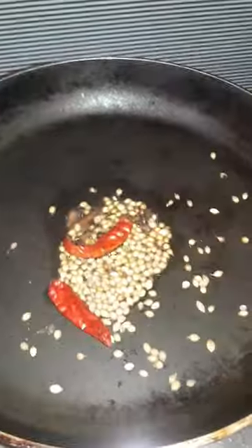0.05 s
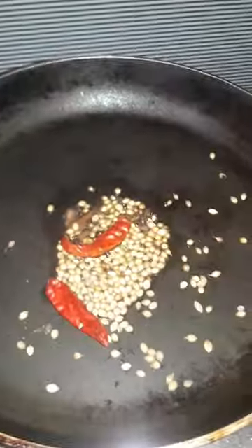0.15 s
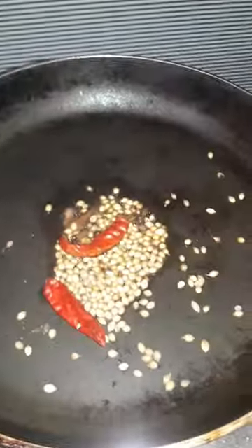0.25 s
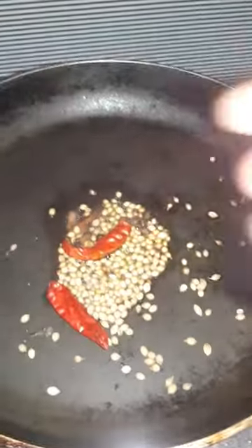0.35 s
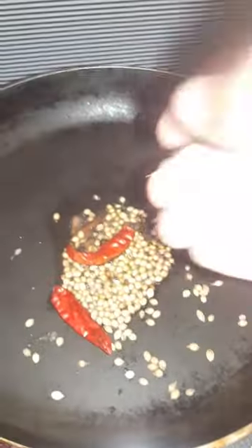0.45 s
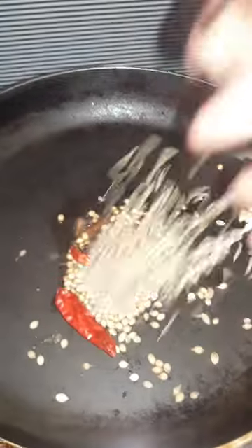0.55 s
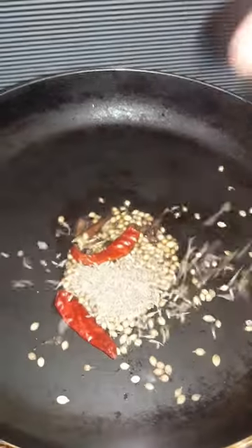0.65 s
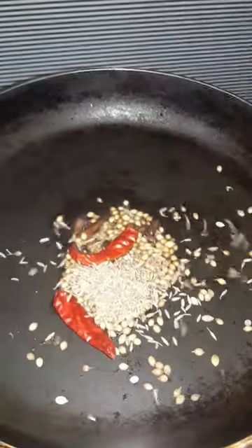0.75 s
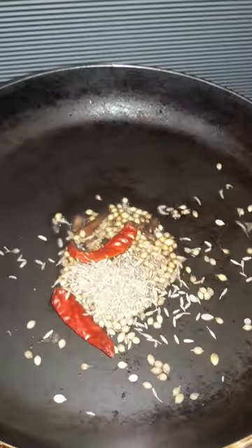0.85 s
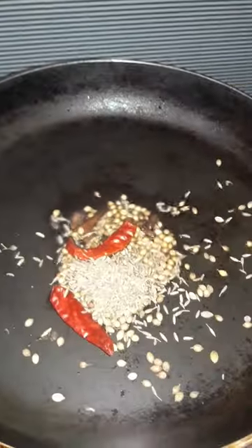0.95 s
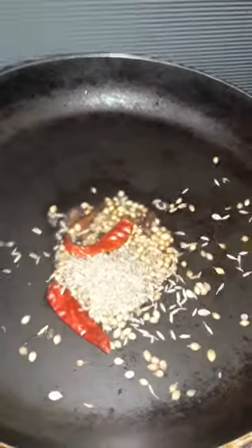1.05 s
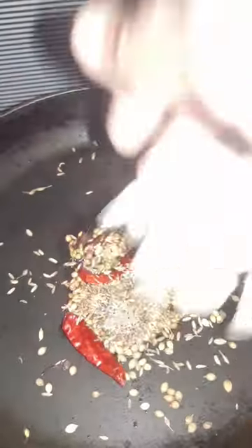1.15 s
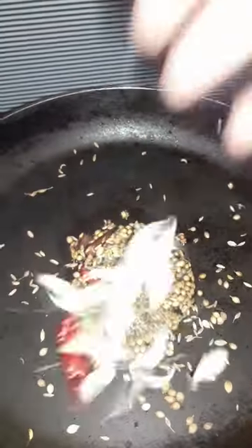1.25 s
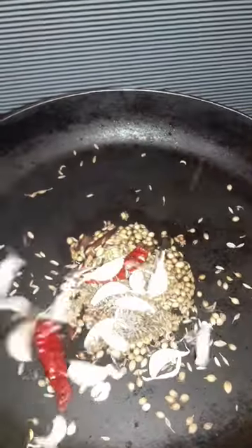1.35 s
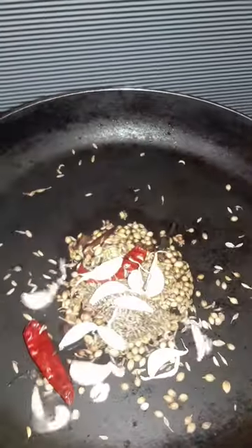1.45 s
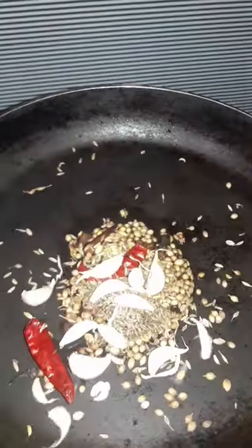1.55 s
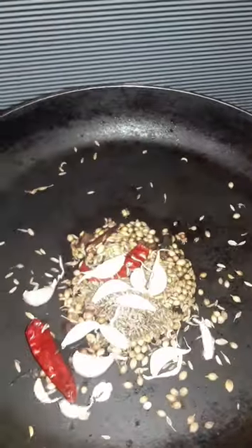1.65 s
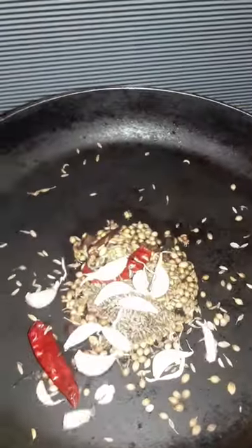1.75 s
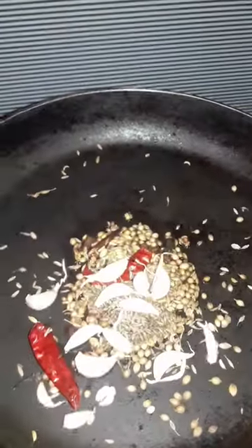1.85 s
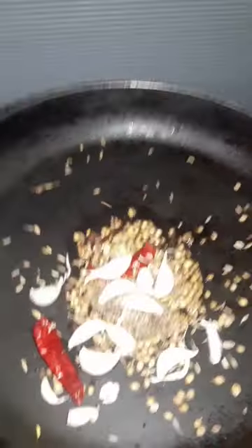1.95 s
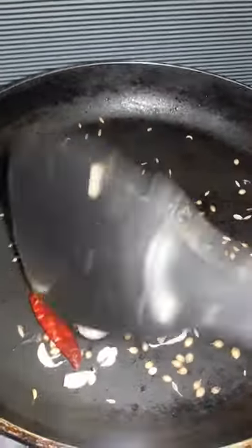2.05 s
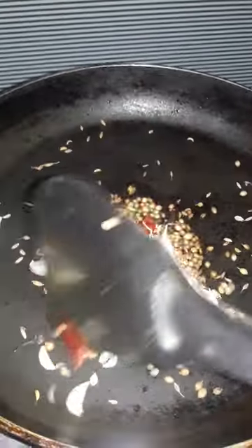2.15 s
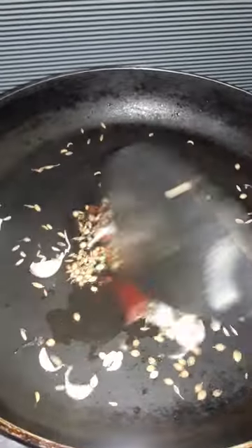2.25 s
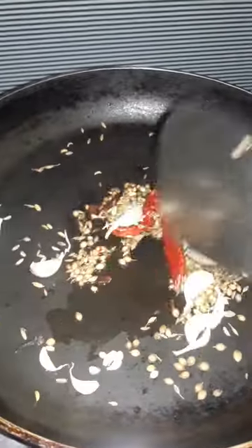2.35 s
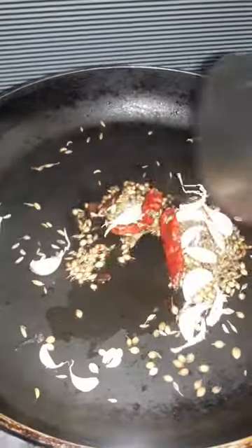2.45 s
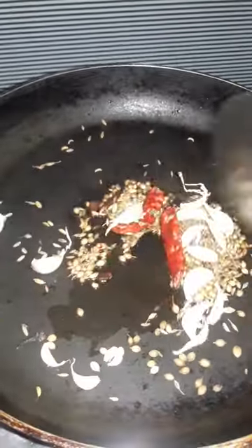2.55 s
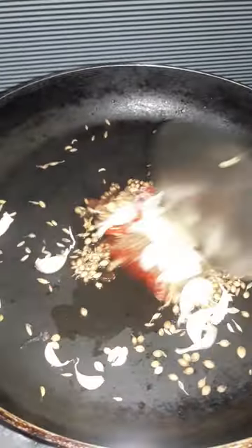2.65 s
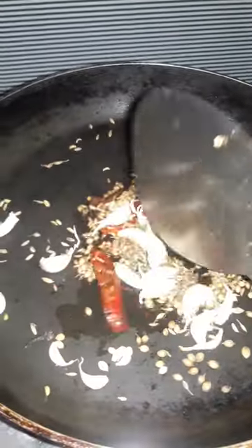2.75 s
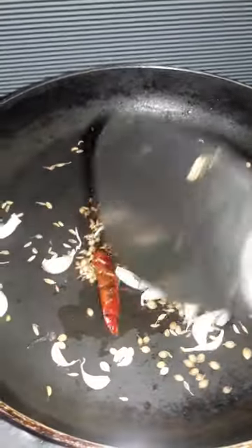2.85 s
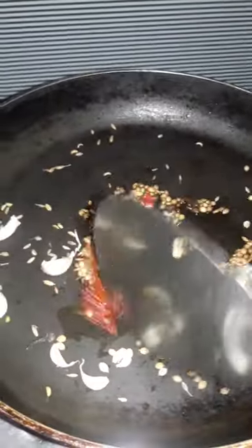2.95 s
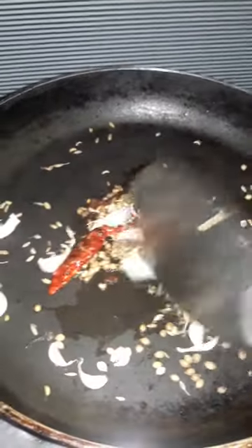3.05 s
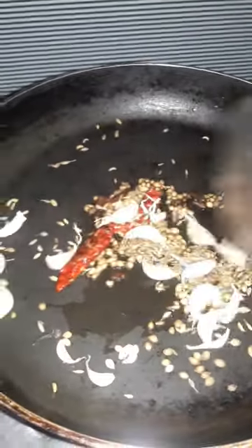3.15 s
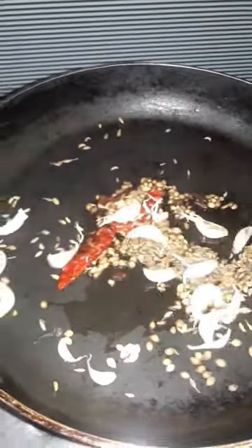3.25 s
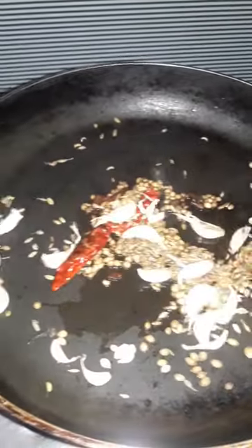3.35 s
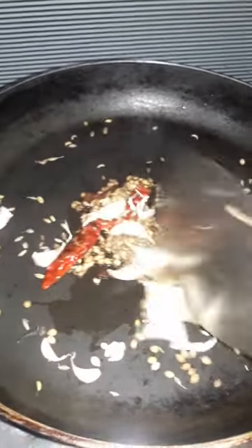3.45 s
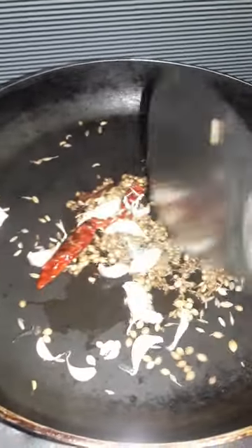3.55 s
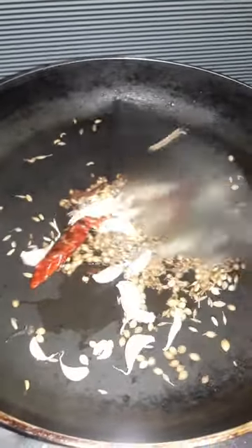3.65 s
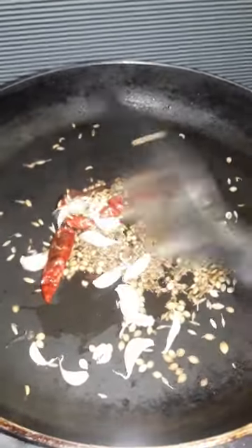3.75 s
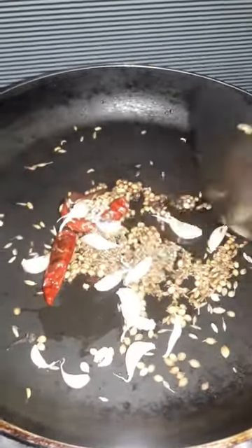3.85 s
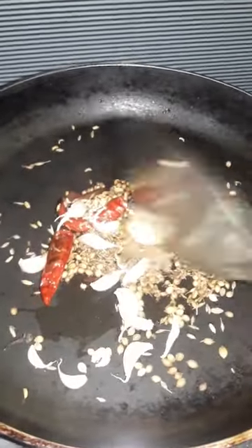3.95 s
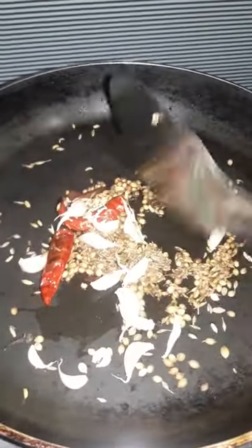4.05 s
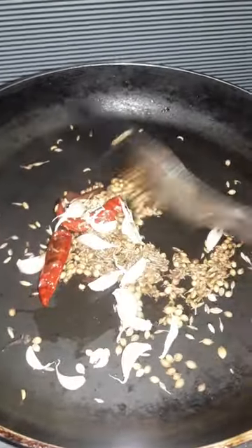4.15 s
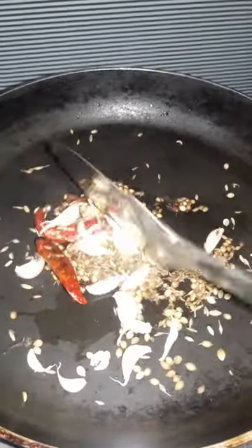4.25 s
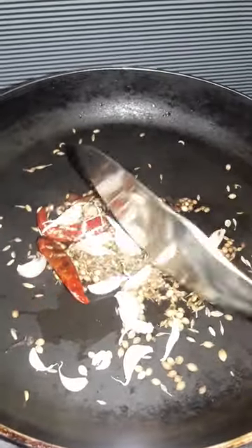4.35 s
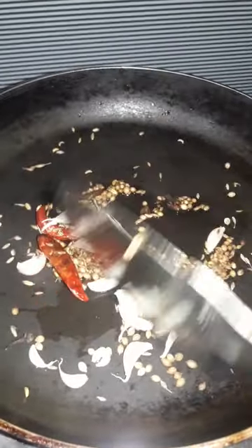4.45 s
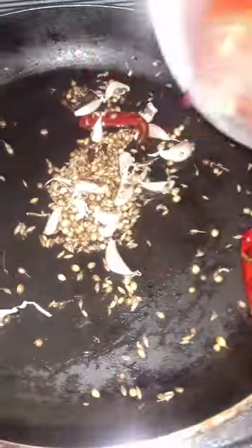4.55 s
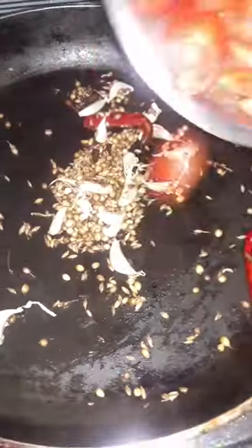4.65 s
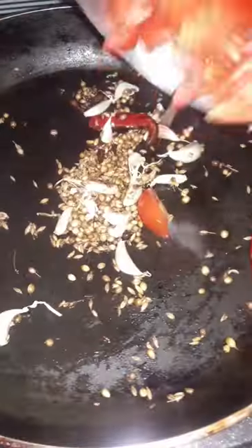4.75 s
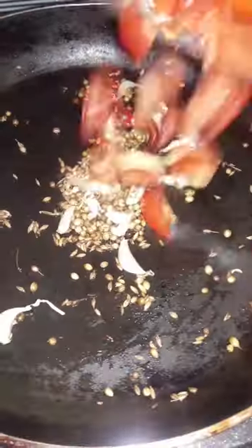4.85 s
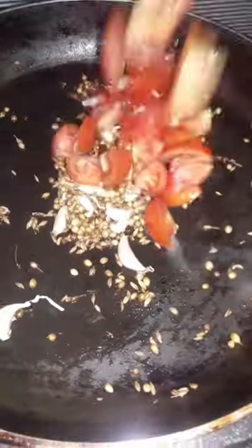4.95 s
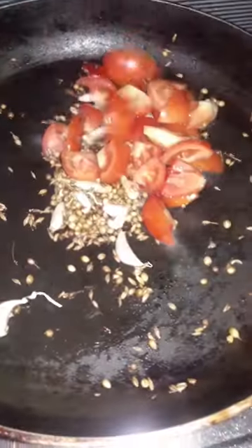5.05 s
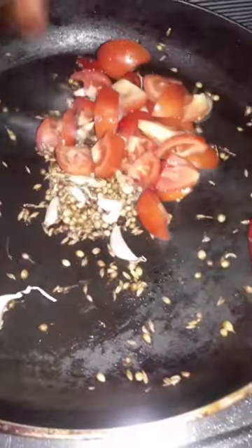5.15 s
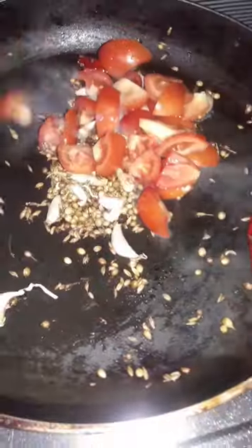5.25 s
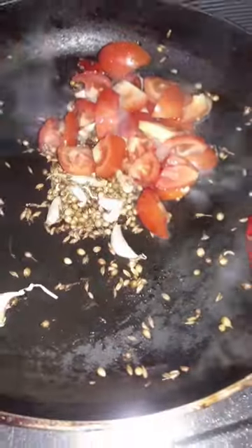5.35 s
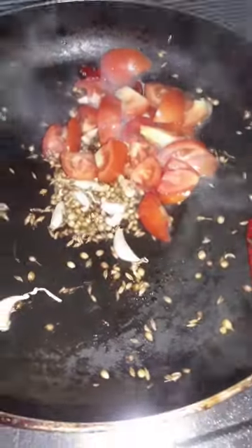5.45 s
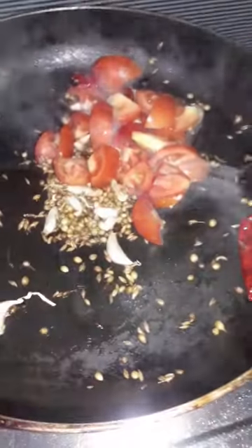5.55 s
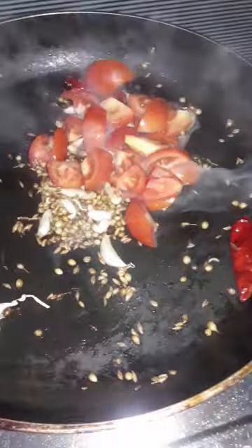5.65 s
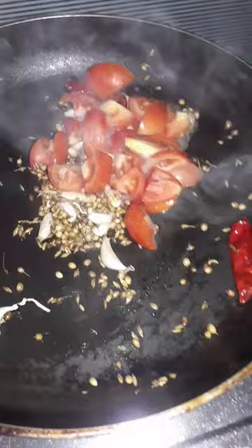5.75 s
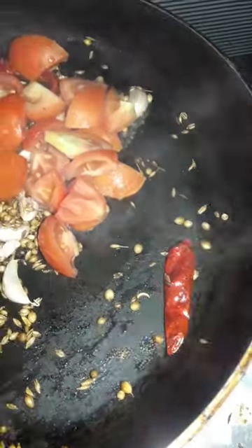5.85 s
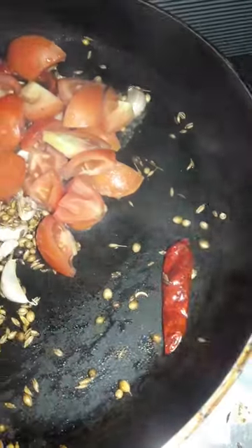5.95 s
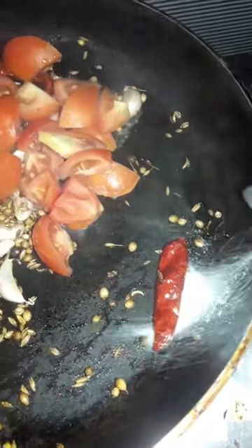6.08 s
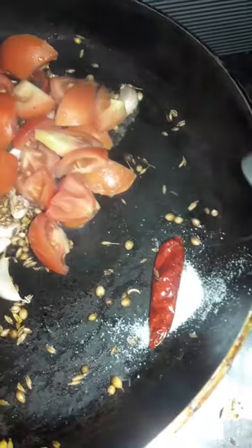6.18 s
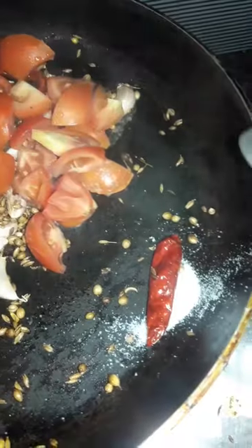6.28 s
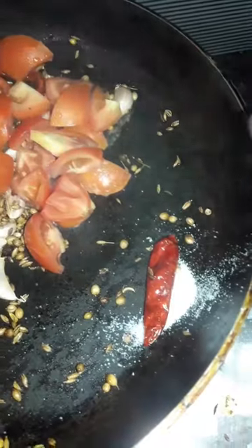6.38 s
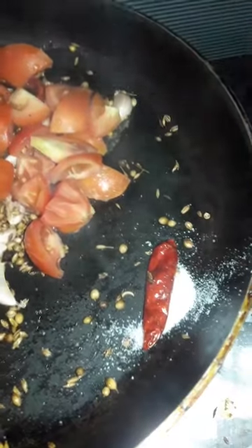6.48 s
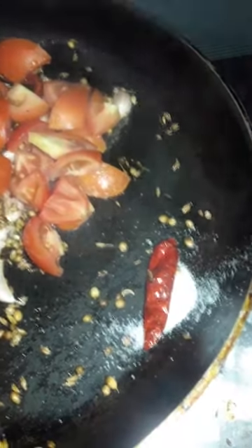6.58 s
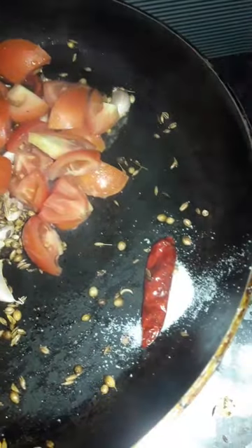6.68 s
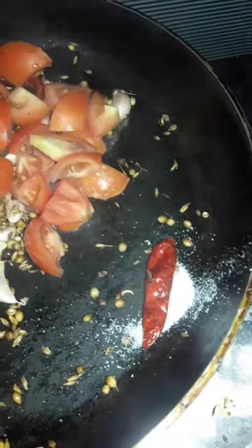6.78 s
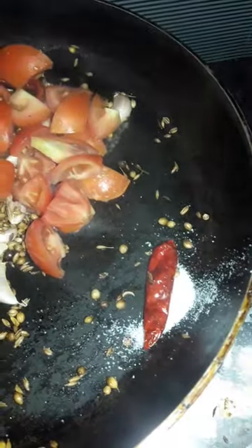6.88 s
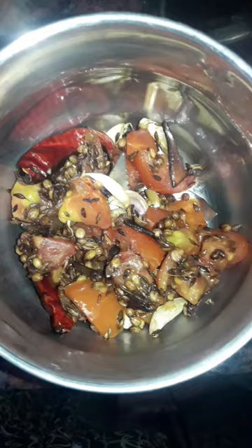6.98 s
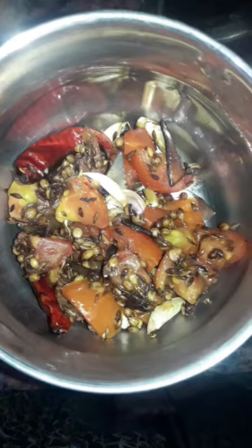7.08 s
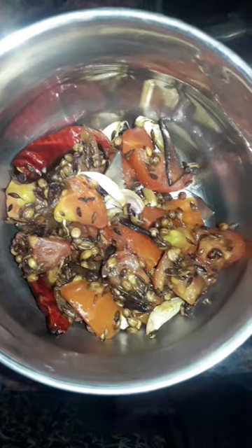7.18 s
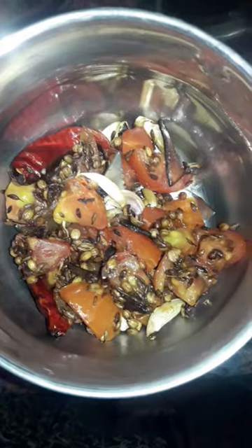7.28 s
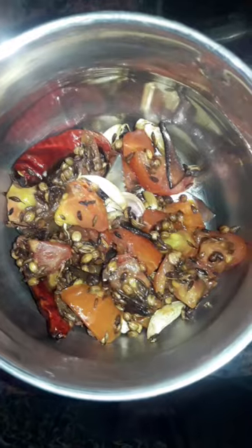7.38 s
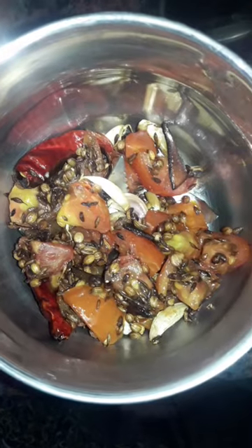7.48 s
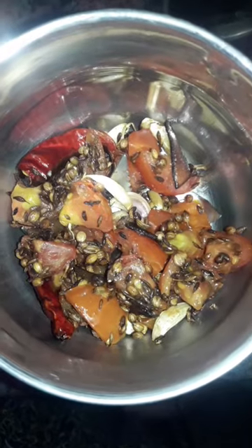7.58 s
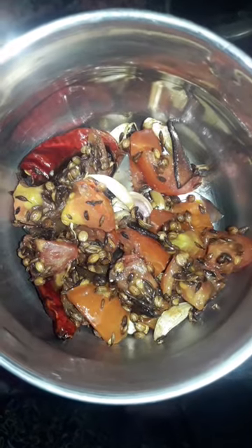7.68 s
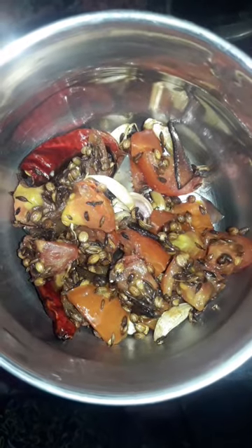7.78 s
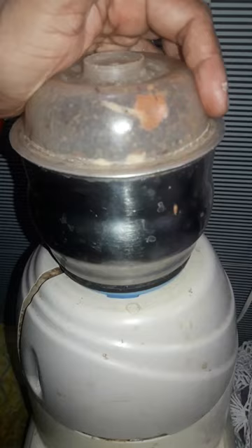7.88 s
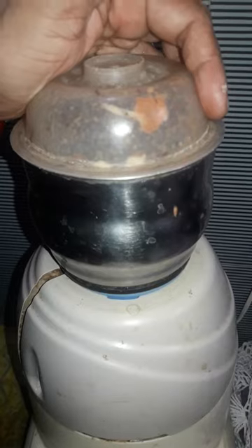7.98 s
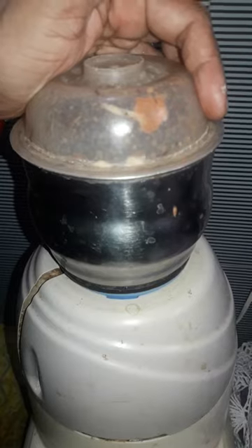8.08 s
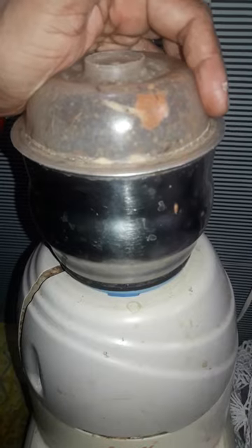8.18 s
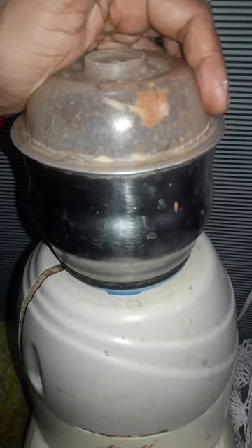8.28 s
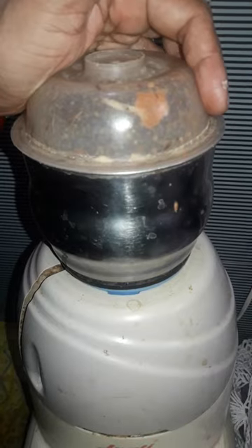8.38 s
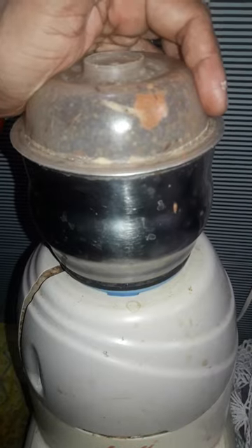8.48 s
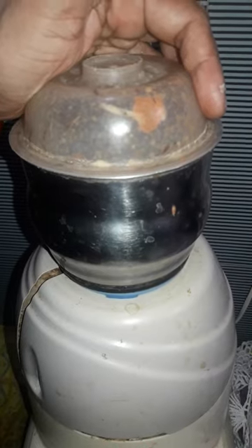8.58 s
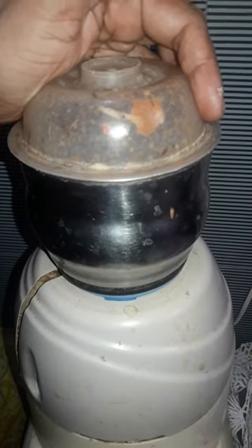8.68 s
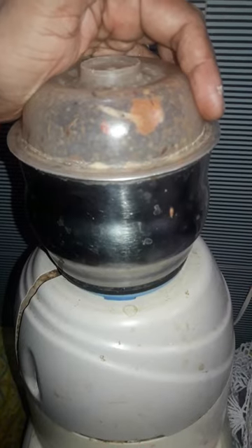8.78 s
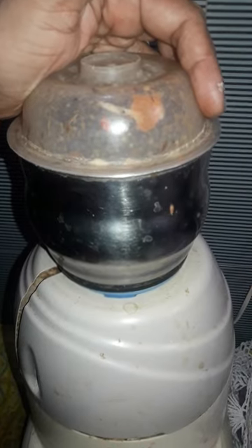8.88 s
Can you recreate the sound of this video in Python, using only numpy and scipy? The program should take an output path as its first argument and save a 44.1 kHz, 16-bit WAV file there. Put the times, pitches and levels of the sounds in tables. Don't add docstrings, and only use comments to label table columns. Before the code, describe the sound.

Close kitchen cooking sounds: ringing steel, rattling seeds and pan knocks, a surge of sizzling steam, a brief quiet, and an abrupt electric grinder whir.

```python
import sys
import numpy as np
from scipy import signal
from scipy.fft import rfft, irfft
from scipy.io import wavfile
from scipy.ndimage import uniform_filter1d

SR = 44100
rng = np.random.default_rng(int(sys.argv[2]) if len(sys.argv) > 2 else 0)


def transcribe(u):
    v = np.clip(np.atleast_2d(u).T, -1, 1)
    q = np.round(v * 32767).astype(np.int16)
    wavfile.write(sys.argv[1], SR, q)


def magnitude_from_level(level_db):
    exponent = np.asarray(level_db, float) / 20
    return 10 ** exponent


N = 393372
T = np.arange(N) / SR


def evened(x):
    return x / np.sqrt(np.mean(x ** 2) + 1e-20)


def colour(x, points):
    hz, db = np.transpose(points)
    f = abs(np.fft.fftfreq(4096, 1 / SR))
    gain_db = np.interp(np.log(f + 1), np.log(hz), db)
    log_gain = np.log(magnitude_from_level(np.maximum(gain_db, -90)))
    taps = np.fft.ifft(np.exp(np.conj(signal.hilbert(log_gain)))).real
    if abs(taps[1:99]).sum() < abs(taps[-99:]).sum():
        taps = np.roll(taps[::-1], 1)
    return evened(signal.oaconvolve(x, taps[:2048])[:len(x)])


def band(x, lo_hz, hi_hz):
    return signal.sosfilt(signal.butter(2, [lo_hz, hi_hz], "band", fs=SR, output="sos"), x)


def curves(table):
    rows = np.array(table)
    return [np.interp(T, rows[:, 0], column, -120, -120) for column in rows.T[1:]]


def wander(hz):
    return evened(signal.sosfilt(signal.butter(1, hz, fs=SR, output="sos"), rng.standard_normal(N)))


def grains(per_s, spread_db):
    size = magnitude_from_level(spread_db * np.minimum(rng.exponential(1, N), 4)) * rng.standard_normal(N)
    return evened(size * (rng.random(N) < per_s / SR))


def resonate(x, peaks):
    out = 0
    for hz, width, db in peaks:
        b, a = signal.iirpeak(hz, hz / (2.4 * width), SR)
        once = signal.lfilter(b, a, x)
        out = out + magnitude_from_level(db) * evened(signal.lfilter(b, a, once))
    return evened(out)


def add(mix, s, sound):
    part = mix[round(s * SR):][:len(sound)]
    part += sound[:len(part)]


def air(spectrum, level_db, hum, rumble_db):
    tones = sum(magnitude_from_level(db + 0.57 * wander(6)) * np.sqrt(2) * np.sin(2 * np.pi * hz * T) for hz, db in hum)
    rumble = magnitude_from_level(rumble_db + 2.1 * wander(4.7)) * evened(band(rng.standard_normal(N), 72, 110))
    hush = magnitude_from_level(level_db + 0.75 * wander(2.1)) * colour(rng.standard_normal(N), spectrum)
    return hush + tones + rumble


def knocks(modes, rows, split_hz, take, crash, tilt_db=0.1, length=0.9):
    wobble_db = 4.5 * (split_hz > 1)
    hz, mode_db, t60 = np.transpose(modes)[:, :, None]
    t, out = np.arange(SR * 2 // 5) / SR, np.zeros(N)
    for row in rows:
        if not take[0] <= row[0] < take[1]:
            continue
        if len(row) > 3:
            s, db, tilt_db, crash_db, length = row
        else:
            s, db, crash_db = row
        place, up, down = rng.standard_normal((3, len(modes), 1))
        tilt = tilt_db * np.log2(hz / 1000)
        level = magnitude_from_level(mode_db + tilt + 0.26 * place - 60 * t / (t60 * length))
        upper_hz = hz + split_hz * (1.146 + 0.45 * up)
        lower_hz = hz - split_hz * (1.6 + 0.6 * down)
        cluster = np.sin(2 * np.pi * hz * t) + 0.78 * np.sin(2 * np.pi * upper_hz * t)
        cluster += 0.35 * np.sin(2 * np.pi * lower_hz * t)
        slow = uniform_filter1d(rng.standard_normal(cluster.shape), size=300)
        flutter = evened(uniform_filter1d(slow, size=300))
        ring = (level * cluster * magnitude_from_level(wobble_db * flutter * np.minimum(t / 0.014, 1))).sum(0)
        fade = magnitude_from_level(-60 * t / (0.24 * length)) + 1.1 * magnitude_from_level(-60 * t / 0.0026)
        burst = crash[round(s * SR):][:len(t)] * fade
        blow = ring / abs(ring).max() + 0.21 * magnitude_from_level(crash_db) * burst
        add(out, s, magnitude_from_level(db) * blow * np.minimum(t / 0.0012, 1))
    return out


# hz, level_db_per_hz
STOVE_AIR = [(35, -33), (60, -22), (127, -19.5), (160, -10), (244, -22), (354, -16), (540, -30.5),
             (607, -7), (682, -28), (749, -20), (822, -22.5), (2300, -37), (6430, -17.5), (8710, -39.5),
             (16000, -23.5)]
# hz, level_db
STOVE_HUM = [(156.5, -56.5), (357, -68), (495, -65), (603, -82)]


def stove_air():
    return air(STOVE_AIR, -48, STOVE_HUM, -76.5)


# peak_s, rattle_db, rise_s, rub_db relative to the rattle
STROKES = [(0.563, -32.5, 0.068, -7), (1.275, -43, 0.23, 7.5), (1.8, -46, 0.91, -3), (2.0, -32, 0.17, -6),
           (2.2, -41.5, 0.083, -1), (2.3, -36.5, 0.15, -32), (2.78, -39.5, 1, -39), (2.967, -45, 0.11, 1),
           (3.13, -56.5, .1, 11), (3.5, -40.5, 0.6, -12), (3.725, -44.5, 0.22, -37), (3.94, -50, 0.17, -12),
           (4.34, -45, 0.96, -23), (4.5, -38, 0.63, -14.5), (7.17, -38, .15, -20)]


def strokes():
    rise_db, settle_db_per_s = 26.5, 66
    rest_db, rest_rub_db = -50, -5.5
    lift_s = 0.073
    cuts = np.array([j[0] for j in JOINS])
    sounding = (T < cuts[2]) * (abs(T - cuts[1] - lift_s / 2) > lift_s / 2)
    rattle = magnitude_from_level(2 * rest_db) * sounding + 1e-12
    rub = rattle * magnitude_from_level(2 * rest_rub_db)
    for s, db, rise_s, rub_db in STROKES:
        take = np.searchsorted(cuts, T) == np.searchsorted(cuts, s)
        drop_db = np.maximum(rise_db * (s - T) / rise_s, settle_db_per_s * (T - s))
        power = take * magnitude_from_level(2 * (db - drop_db))
        rattle, rub = rattle + power, rub + power * magnitude_from_level(2 * rub_db)
    return 10 * np.log10(rattle), 10 * np.log10(rub)


# hz, level_db_per_hz
SEEDS = [(1180, -62), (2000, -48), (2740, -9), (5160, 0.5), (6590, 4.5), (8400, -12), (11900, -6),
         (16000, -2)]


def stirring(ticks, rough):
    rattle_db, rub_db = strokes()
    rattle = magnitude_from_level(rattle_db + 1.0 * wander(37.2)) * colour(ticks, SEEDS)
    rubbing = evened(band(rough + 1.4 * rng.standard_normal(N), 550, 4900))
    return rattle + magnitude_from_level(rub_db + 0.5 * wander(25)) * rubbing


# hz, level_db, t60_s
TIN = [(337, -4.5, 0.47), (1470, -7, 0.29), (1760, -6, 0.4), (2160, -1, 0.3), (2490, -5, .2),
       (4150, 5.5, 0.25), (4440, 1, 0.3)]
CUP = [(860, -5.5, 0.14), (2010, -8, .06), (2120, 1, 0.099), (2300, 0, 0.09), (2580, -3, 0.082),
       (2700, -16, .08), (3700, -2, 0.062), (4120, 1, 0.05), (4290, -2, 0.07), (6250, -6, 0.11),
       (6630, -3, 0.13), (10600, -8, 0.15), (10950, -6, 0.19), (11400, -7, 0.07)]
GLASS = [(10300, -1, 0.394), (13100, -10, .15)]
BOWL = [(929.4, -3.5, 0.9), (1513, -2.5, 0.06), (1850, 0.5, 0.055), (2070, 3, 0.23), (2120, -3, 0.316),
        (2730, -7, 0.063)]
BOWL_TOP = [(10900, 1, .1), (11500, -5, .1), (12400, 1, .08), (14100, -4, .08), (14600, -7, .08),
            (15400, -9, .06)]
# start_s, peak_db, crash_db
TIN_KNOCKS = [
    (0, -25, -5.5),
]
CUP_KNOCKS = [
    (0.4369, -2, -22),
]
GLASS_KNOCKS = [
    (.942, -46, -44),
]
BOWL_KNOCKS = [
    (1.0168, 3, -21),
]
BOWL_TOP_KNOCKS = [
    (1.019, -11.5, -41),
]


def small_ware(take, crash):
    return (knocks(TIN, TIN_KNOCKS, 70, take, crash)
            + knocks(CUP, CUP_KNOCKS, 70, take, crash, 0.95, 0.45)
            + knocks(GLASS, GLASS_KNOCKS, 30, take, crash)
            + knocks(BOWL, BOWL_KNOCKS, 0.01, take, crash, 0.1, 0.96)
            + knocks(BOWL_TOP, BOWL_TOP_KNOCKS, 120, take, crash))


# start_s, peak_db, scatter_db of seeds after it, pitch_hz
SNAPS = [(0.436, -18, -25, 4280), (0.942, -26.5, -17.5, 6050), (0.969, -34, -27, 6000),
         (1.0193, -21, -24, 4070), (1.048, -24, -18.5, 5600), (1.2173, -15, -23, 3820),
         (1.3932, -24, -23, 5930), (1.5436, -18, -19.5, 5070), (1.6315, -17.5, -20.5, 5160),
         (1.8348, -13.5, -21, 5200), (1.9118, -13.5, -17, 5540), (2.4714, -24.5, -17, 6720),
         (2.4799, -23, -23, 5100), (2.501, -12, -35, 6250), (2.811, -25.5, -15, 6640),
         (2.894, -27, -11.5, 6400), (3.0082, -14.5, -18.5, 3900), (3.242, -9.5, -22, 4900),
         (2.68, -25, -29, 5600), (3.5963, -25, -24, 6640), (3.6294, -25.5, -22, 6170),
         (3.772, -32.5, -10.5, 5170), (3.812, -27, -32, 5330), (3.832, -15, -28, 5280),
         (4.16, -30, -18, 5250), (4.1942, -17.5, -26.5, 5530), (4.2442, -23, -25, 5230),
         (4.229, -27, -28, 6000), (4.356, -28, -27, 4930), (4.39, -30, -18, 5560), (4.296, -27, -22, 6800),
         (4.42, -19.5, -16.5, 6520), (2.652, -24, -26, 5200)]
# start_s, peak_db
SPITS = [(4.7502, -9), (4.7735, -13), (4.8081, -9.5), (4.829, -4), (4.8995, -17), (4.9305, -8),
         (4.941, -14), (4.9545, -11), (4.978, -10), (4.988, -13), (5.0605, -7)]
# start_s, peak_db
TICKS = [(0.7756, -36), (0.8724, -33), (1.2244, -31), (1.3094, -36), (1.4556, -38), (2.2714, -34),
         (2.394, -28), (2.4484, -24), (2.4663, -25), (2.5054, -62), (2.6968, -34), (2.7661, -28),
         (2.7744, -33), (2.8135, -22), (2.8244, -27), (2.8674, -14), (2.9018, -23), (4.751, -13),
         (4.8993, -19), (3.596, -37), (3.813, -31), (4.297, -26), (4.428, -13), (4.39, -25)]


def snaps(start, end):
    t, out = np.arange(SR // 5) / SR, np.zeros(N)
    white = rng.standard_normal(N)
    bright = evened(band(white, 10350, 13240))
    hiss = colour(white, SEEDS) + 0.18 * bright
    spits = [(*spit, -24.5, 6400) for spit in SPITS]
    for s, db, scatter_db, hz in SNAPS + spits:
        detune = np.clip(rng.standard_normal((4, 1)), -1.5, 1.8)
        near = hz * (1 + 0.104 * np.array([[0], [1], [1], [1]]) * detune)
        ring = np.sin(2 * np.pi * near * t).mean(0) * magnitude_from_level(-60 * t / 0.018) * np.minimum(t / 0.0005, 1)
        fade = 0.24 * magnitude_from_level(-60 * t / 0.011) + magnitude_from_level(scatter_db - 60 * t / 0.3)
        tick = hiss[round(s * SR):][:len(t)] * fade
        snap = (start <= s < end) * magnitude_from_level(db + 5.0) * (0.8 * ring + tick)
        add(out, s, snap)
        add(out, s + 0.009, magnitude_from_level(-5.5 - 60 * t / 0.019) * snap)
    for s, db in TICKS:
        fade = magnitude_from_level(db - 15.5 - 60 * t / 0.024)
        add(out, s, (start <= s < end) * fade * bright[round(s * SR):][:len(t)])
    return out


# start_s, level_db
POPS = [
    (1.0446, -12.5),
    (4.509, -31),
    (7.897, -6),
]


def pops(out):
    for s, db in POPS:
        add(out, s, -magnitude_from_level(db) * np.exp(-np.arange(400) / (0.00023 * SR)))


def far_tone():
    second = (T > JOINS[0][1]) * (T < JOINS[1][0])
    return second * magnitude_from_level(-57.5 + 1.6 * wander(8)) * np.sin(2 * np.pi * 216 * T)


# hz, level_db, t60_s
PAN_LADEN = [(272, -14.5, 0.27), (794, -15, 0.11), (1104, -1.5, 0.13), (1436, -2, 0.45), (2100, -0.5, 0.41),
             (2370, -6, 0.17), (2900, 2, 0.37), (3806, 3.5, 0.24), (4450, -16, .12), (4560, -5, .15),
             (4900, -11, .4)]
PAN_RIM = [(1760, -17, 0.078), (2600, -6, .15), (3430, -4, .15), (5170, -4, .2), (6000, 8, 0.18),
           (6400, 1, .1), (6800, 3, .2), (7100, 0, .2)]
SPOON = [(1070, -4, 0.035), (1645, -1, 0.033), (2080, 1, 0.043), (2780, -2, 0.045), (4120, -6, .04)]
PAN = [(282, -3, 0.13), (722, -9.5, 0.21), (773, 5, 0.16), (994, 6.5, 0.14), (1439, -5, 0.44),
       (1540, -9, 0.2), (2050, -9, 0.5), (2093, -4, 0.36), (2370, -17, 0.45), (2850, 2.5, 0.23),
       (3110, -27, .2), (3776, -1, 0.23), (4380, -12, 0.18), (4800, -4, 0.22)]
TRIVET = [(224.3, -7, 0.46), (278.4, 4, 0.17), (361, -4, 0.33), (448.5, -1, 0.36), (566, 2.5, 0.22),
          (642, 3, 0.14), (713, 2.5, 0.23), (928, 5, 0.14), (1074, -10, 0.21), (1380, -4.5, 0.3),
          (1910, -13, 0.36), (2450, -10, 0.19)]
# start_s, peak_db, tilt_db_per_octave, crash_db of loose parts, ring length as a factor
LADEN_KNOCKS = [
    (1.175, -18, 9, 2, 0.37),
    (1.18, -2, 2, -10, 0.47),
    (1.186, -18.5, -5, -18, 0.91),
    (1.33, -21, -1, -14, 0.97),
    (1.342, -15.5, 0, -21, 0.72),
]
PAN_KNOCKS = [
    (2.5021, -8.5, -8.5, -10, 0.45),
    (2.5386, -5.5, -2.5, -4, 0.73),
    (2.935, 3, 3.5, -7.5, 0.75),
    (2.948, -4.5, -2, -18, 0.67),
]
TRIVET_KNOCKS = [
    (2.5004, -9.5, -2, -13, 1),
    (3.242, -2.5, -1, -4, 0.87),
    (3.252, -23, -4, -20, .8),
    (3.343, -1, -1, -0.5, 0.28),
    (3.357, -4, -5.5, -14, 0.7),
]
# start_s, peak_db, crash_db
RIM_KNOCKS = [
    (1.179, -15, -26),
    (2.501, -20, -17),
    (2.54, -28, -17),
    (2.936, -10, -29),
]
SPOON_KNOCKS = [
    (1.568, -20.5, -11),
    (1.617, -18, -12),
    (1.659, -28, -14),
    (1.833, -21, -6),
    (1.911, -17, -12),
    (1.94, -23.5, -3),
    (7.71, -31.5, -10),
]


def pan_and_spoon(take, crash):
    return (knocks(PAN_LADEN, LADEN_KNOCKS, 22, take, crash)
            + knocks(PAN_RIM, RIM_KNOCKS, 40, take, crash)
            + knocks(SPOON, SPOON_KNOCKS, 60, take, crash)
            + knocks(PAN, PAN_KNOCKS, 22, take, crash)
            + knocks(TRIVET, TRIVET_KNOCKS, 17, take, crash))


# hz, width_hz, level_db
SCRAPE = [(2200, 50, -9), (2865, 32, 5.5), (3740, 50, 9), (4280, 60, 6), (4570, 80, 1), (4930, 67, 0),
          (6700, 90, -9)]
# start_s, level_db, note_hz, squeal_hz
DRAG = [
    (1.56, -46, 1320, 2600),
    (1.612, -54, 1290, 2580),
    (1.622, -30, 1325, 2570),
    (1.7, -25.5, 1290, 2470),
    (1.78, -26, 1310, 2440),
    (1.84, -25, 1273, 2350),
    (1.885, -33, 1110, 2300),
    (1.91, -47, 1100, 2260),
]


def dish_drag(rough):
    drag_db, note_hz, squeal_hz = curves(DRAG)
    lowest = np.exp(2j * np.pi * np.cumsum(note_hz) / SR)
    second = np.exp(2j * np.pi * 1.53 * np.cumsum(note_hz) / SR)
    squeal = np.exp(2j * np.pi * np.cumsum(squeal_hz) / SR)
    narrow = signal.butter(2, 16, fs=SR, output="sos")
    note = 0
    for carrier, gain in ((lowest, 1), (second, magnitude_from_level(-4)), (squeal, 0.58 * magnitude_from_level(4.7 * wander(13)))):
        slow = signal.sosfilt(narrow, rng.standard_normal(N) / carrier)
        note = note + gain * (carrier * slow).real
    slips = (rough + rng.standard_normal(N)) * magnitude_from_level(1.5 * wander(45))
    modes = sum(magnitude_from_level(peak[2] + 2.5 * wander(8.1)) * resonate(slips, [peak]) for peak in SCRAPE)
    drag = evened(modes) + 0.69 * evened(band(rough, 1140, 4100)) + 0.64 * evened(note)
    return magnitude_from_level(drag_db - 9.5 + 1.2 * wander(30)) * drag


# hz, level_db, t60_s
DISH = [(1050, -7, 0.59), (1100, -1, 0.074), (2650, -10, 0.099), (3650, -9, .1), (4360, -5, .1),
        (4700, -2, 0.14), (6450, -9, .12), (6850, -4, 0.16), (7200, -9, 0.12)]
HANDLE = [(726, 0.5, 0.17), (795, 0.5, 0.094), (965, -3, 0.13), (1500, -9, .05), (1780, -10, .05)]
# start_s, peak_db, crash_db
DISH_KNOCKS = [
    (1.94, -14, -3),
    (1.951, -8, -34),
    (1.962, -7.5, -35),
    (1.977, -27, -29),
]
HANDLE_KNOCKS = [
    (3.902, -18, -6.5),
    (3.878, -44, 4),
    (4.093, -29, 4),
    (4.506, -25, 1.5),
    (4.709, -30, -15),
    (4.907, -25, -13),
]


def dish_and_handle(take, crash):
    return (knocks(DISH, DISH_KNOCKS, 40, take, crash, 1.5, 0.6)
            + knocks(HANDLE, HANDLE_KNOCKS, 30, take, crash, 1.5, 0.7))


# start_s, level_db
TOSS = [
    (2.805, -52),
    (2.815, -35.5),
    (2.92, -42),
    (2.94, -54),
]


def seed_toss(ticks):
    return magnitude_from_level(curves(TOSS)[0] + 3.5 * wander(40)) * evened(band(ticks, 10600, 15500))


# start_s, level_db
SCUFF = [
    (4.1, -60),
    (4.382, -50),
    (4.508, -58),
]


def pan_shift(rough):
    low = band(band(rough, 300, 634), 260, 634)
    return magnitude_from_level(curves(SCUFF)[0] + 0.66 * wander(18)) * evened(low)


# start_s, hiss_db that stands for the heat
SIZZLE = [(4.708, -37), (4.748, -32), (4.88, -28.5), (4.93, -25.5), (5.0, -19.5), (5.07, -15.5),
          (5.15, -14), (5.24, -13.5), (5.47, -14.5), (5.8, -18.5), (6.96, -20.5), (6.97, -44)]
# hz, level_db_per_hz
STEAM = [(120, -63), (200, -31.5), (509, -34), (659, -28), (1080, -19.5), (1810, -22.5), (5900, 12),
         (6900, 7), (8420, -13.5), (11900, -6.5), (16000, -9)]
# hz, width_hz, level_db
PAN_HOLLOW = [(1065, 900, -18), (2890, 110, 12), (4300, 410, 16)]


def sizzle():
    hiss_db = curves(SIZZLE)[0]
    heat_db = np.maximum(hiss_db, -40) + 18
    body_db, top_db = -14.5 - 0.15 * heat_db, -2 - 0.031 * heat_db
    middle_db = -6 + 0.39 * heat_db
    middle_db = middle_db + 1.5 * (T - 5) - 4 * np.clip((T - 5.3) / 0.13, 0, 1)
    steam = rfft(colour(grains(5000, 2.2) + rng.standard_normal(N), STEAM))
    hz = np.log(np.fft.rfftfreq(N, 1 / SR) + 1)
    shares = [np.interp(hz, np.log([1800, 3300, 5600, 11000]), row) for row in np.eye(4)]
    body, middle, hiss, top = (evened(irfft(steam * share, N)) for share in shares)
    mix = hiss + magnitude_from_level(middle_db) * middle + magnitude_from_level(body_db) * body + magnitude_from_level(top_db) * top
    gusts = irfft(steam, N) * magnitude_from_level(9.2 * wander(25))
    mix += magnitude_from_level(body_db - 4.5) * resonate(gusts, PAN_HOLLOW)
    dip_s, dip_db, recovery_s = 5.784, -14, 0.013
    join_db = dip_db * np.clip(1 - (T - dip_s) / recovery_s, 0, T > dip_s)
    return magnitude_from_level(hiss_db + join_db - 2.5 + 0.5 * wander(83)) * mix


# start_s, length_s, low_hz, high_hz, level_db
PARTINGS = [
    (5.455, 0.067, 5660, 6560, -18),
    (5.46, 0.22, 12700, 15900, -35),
]


def partings():
    out = np.zeros(N)
    for s, length, lo_hz, hi_hz, db in PARTINGS:
        noise = band(band(rng.standard_normal(round(length * SR)), lo_hz, hi_hz), lo_hz, hi_hz)
        add(out, s, magnitude_from_level(db) * evened(noise) * np.hanning(len(noise)))
    return out


# hz, level_db, t60_s
LID = [(260, -5.5, 0.22), (766, -5, 0.27), (960, -1, 0.061), (1093, 0, 0.17), (1460, -9, 0.1),
       (1950, -0.5, 0.2), (2470, -6, 0.079)]
# start_s, peak_db, crash_db
LID_KNOCKS = [
    (6.003, -10, -2.5),
]


def lid(take, crash):
    return knocks(LID, LID_KNOCKS, 9, take, crash)


# hz, level_db_per_hz
COUNTER_AIR = [(24, -65), (40, -39), (185, -8), (237, -9), (290, -0.5), (382, -8.5), (630, -4), (1550, -15),
               (6650, -8), (8340, -24), (16000, -15)]
# hz, level_db
COUNTER_HUM = [(156.1, -55.5), (188.4, -45), (285.3, -59)]


def counter_air():
    return air(COUNTER_AIR, -36.5, COUNTER_HUM, -53.5) * np.where(T < 7.89, 1, 0.4)


# hz, level_db, t60_s
JAR = [(580, 9.5, 0.044), (664, 5, 0.089), (882, 12.5, 0.11), (1010, 9.5, 0.067), (2160, -2, 0.4),
       (3524, -2, 0.23)]
# start_s, peak_db, tilt_db_per_octave, crash_db, ring length as a factor
JAR_KNOCKS = [
    (7.106, -18.5, 5, -22, 1.06),
    (7.112, -10.5, -14, -28, 0.78),
    (7.122, -19, -8, -12, .9),
    (7.25, -45, 8, -20, .5),
    (7.7129, -29, -4, 9.5, 1.25),
]


def jar(take, crash):
    return knocks(JAR, JAR_KNOCKS, 25, take, crash)


# start_s, shaft_hz, tone_db, roar_db
GRIND = [
    (7.897, 274, -27, -16.5),
    (7.911, 273.7, -15, -15),
    (7.925, 275.3, -19, -13),
    (8.479, 276.6, -18.5, -13.5),
    (8.681, 275.5, -20.5, -14),
    (8.909, 274.9, -18.5, -17),
    (8.92, 275.5, -25, -15.5),
]
SHAFT = [3.5, -12.5, -13.5, -16, -11, -21, -21, -12, -18, -12, -15, -10.5]
# hz, level_db_per_hz
ROAR = [(190, -21.5), (330, -4), (388, -13), (546, -5.5), (663, -5.5), (806, -10.5), (903, -9),
        (1380, -2.5), (1910, -7), (2600, -7.5), (2900, -3), (5390, -2.5), (5940, 3.5), (8490, -31),
        (10500, -17.5), (16000, -24.5)]
# hz, width_hz, level_db
HOUSING = [(793, 45, -2), (1014, 40, -0.5), (2296, 166, 7.5), (2440, 47, 2.5), (2730, 150, 8.5),
           (3450, 130, 5), (3957, 51, 5.5), (5000, 230, 1), (5940, 250, 4.5), (6450, 140, -5.5)]
JAR_TOP = [(9890, 60, -5.5), (10760, 180, -2), (11150, 160, -1), (12300, 200, 0), (13150, 150, -5),
           (13500, 100, -4), (14700, 300, -6), (15300, 250, 2)]
# start_s, level_db
LUMPS = [(7.9059, 1), (7.9498, 3), (8.0006, -3), (8.0266, -1), (8.0665, -10), (8.083, 0), (8.1099, 0),
         (8.137, 3), (8.1857, -6), (8.2112, -17), (8.2329, -6), (8.2624, -3), (8.288, 2.5), (8.3194, -18),
         (8.3523, -3), (8.3825, -10), (8.4022, -9), (8.4169, -6), (8.4352, -3), (8.4821, 2.5), (8.5255, -7),
         (8.5501, 1), (8.5923, 3), (8.624, 1), (8.6741, -8), (8.7135, 1), (8.739, -5), (8.784, -16),
         (8.8, 1), (8.8737, 0)]


def grinder():
    hz, tone_db, roar_db = curves(GRIND)
    turns = np.cumsum(np.maximum(hz, 0) * (1 + 0.002 * wander(6.0))) / SR
    orders = 0
    for k, db in enumerate(SHAFT, 1):
        level = magnitude_from_level(db - SHAFT[0] + 1.0 * k ** 0.16 * wander(32))
        orders = orders + level * np.cos(2 * np.pi * k * turns + k * k)
    throb = 1 + 0.5 * np.cos(2 * np.pi * turns + 1.24)
    chop = (rng.standard_normal(N) + 0.6 * grains(2500, 5.5)) * throb
    spray = resonate(throb * rng.standard_normal(N), JAR_TOP)
    spray = spray + 0.89 * evened(band(band(chop, 9000, 19000), 9000, 19000))
    bursts, t = np.full(N, 0.34), np.arange(SR // 10) / SR
    for s, db in LUMPS:
        add(bursts, s, magnitude_from_level(db + 5.0) * np.exp(-t / 0.016))
    clang = magnitude_from_level(-6.5) * bursts * resonate(chop[::-1] / throb[::-1] * throb ** 2, HOUSING[-3:])
    top = magnitude_from_level(-20.5) * bursts * spray
    housing = resonate(rng.permutation(chop / throb) * throb, HOUSING)
    roar = evened(colour(chop, ROAR) + 0.71 * housing + top + clang)
    return np.sqrt(2) * magnitude_from_level(tone_db) * orders + magnitude_from_level(roar_db + 0.4 + 1.0 * wander(60)) * roar


def kitchen(x, t60, wet_db):
    t = np.arange(SR // 2) / SR
    noise = rng.standard_normal(len(t)) * (t > 0.004)
    tail = band(noise, 210, 4520) * magnitude_from_level(-60 * t / t60)
    tail = tail + 0.79 * band(noise, 2900, 9100) * magnitude_from_level(-90 * t / t60)
    return x + magnitude_from_level(wet_db) * signal.oaconvolve(x, tail / np.linalg.norm(tail))[:len(x)]


# old take's end_s, next take's start_s
JOINS = [
    (1.0445, 1.0445),
    (2.011, 2.011),
    (4.5088, 4.5088),
    (6.964, 6.976),
    (7.885, 7.8965),
]
# hz, level_db_per_hz
CRASH = [(71, -40), (120, -22), (267, -16.5), (1010, 0.5), (1210, -6), (3820, -9), (6900, -12), (8400, -32),
         (11500, -28.5), (16000, -25.5)]


def scene():
    room = np.where(T < 6.97, stove_air(), counter_air()) + far_tone()
    ticks = grains(2500, 0.74) + 0.66 * rng.standard_normal(N)
    rough = grains(3000, 2.5)
    steady = stirring(ticks, rough) + dish_drag(rough) + seed_toss(ticks) + pan_shift(rough)
    steady += sizzle() + grinder()
    out = np.zeros(N)
    crash = colour(rng.standard_normal(N), CRASH)
    bass_cut = signal.butter(4, 150, "high", fs=SR, output="sos")
    for start, end in zip([0] + [j[1] for j in JOINS], [j[0] for j in JOINS] + [N / SR]):
        take = slice(round(start * SR), round(end * SR))
        blows = snaps(start, end)
        for struck in (small_ware, pan_and_spoon, dish_and_handle, lid, jar):
            blows += struck((start, end), crash)
        near = steady[take] + kitchen(blows[take], 0.32, -7.5)
        out[take] = room[take] + signal.sosfilt(bass_cut, near)
    pops(out)
    side = partings()
    return np.array([out + side, out - side])


def roll_off(x):
    return signal.sosfilt(signal.butter(12, 17000, fs=SR, output="sos"), x)


def record(dry):
    edge = signal.firwin(701, 15740, window=("kaiser", 11), fs=SR)
    mix = signal.oaconvolve(np.clip(dry, -0.9, 0.9), edge[None], "same")
    return roll_off(mix)


dry = scene()
out = record(dry)
transcribe(out)
```